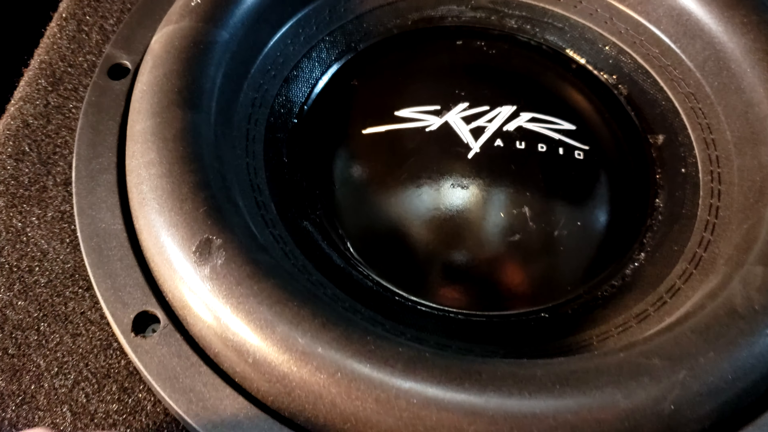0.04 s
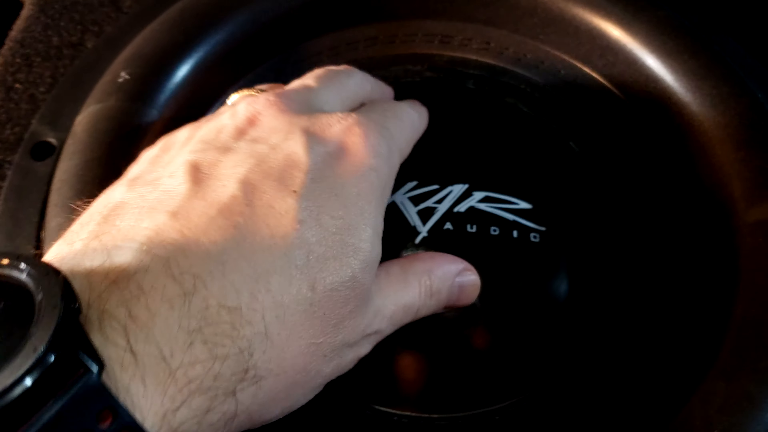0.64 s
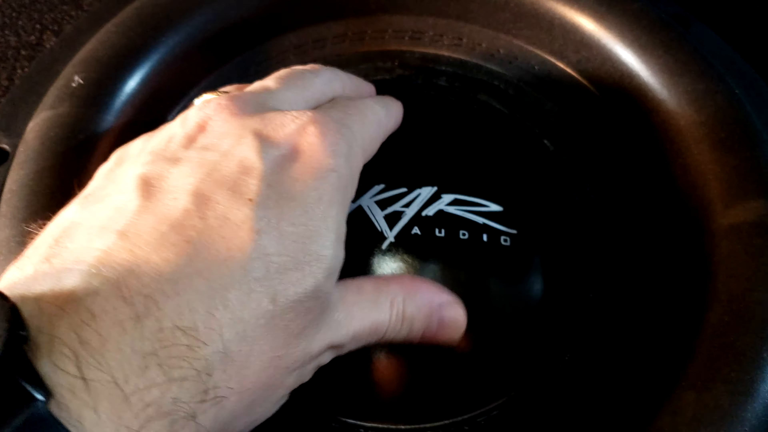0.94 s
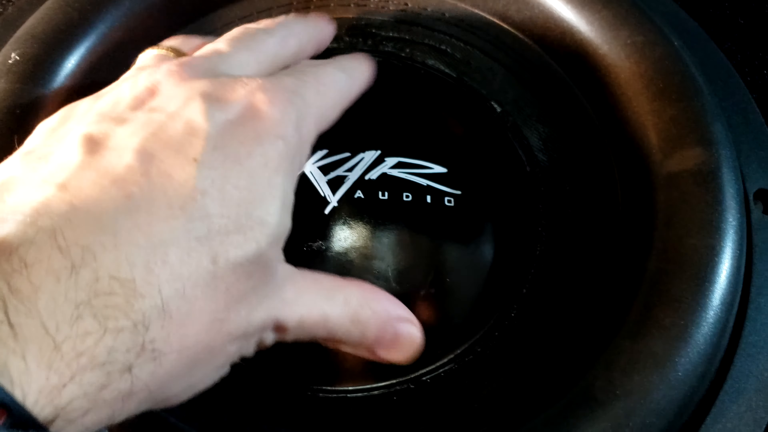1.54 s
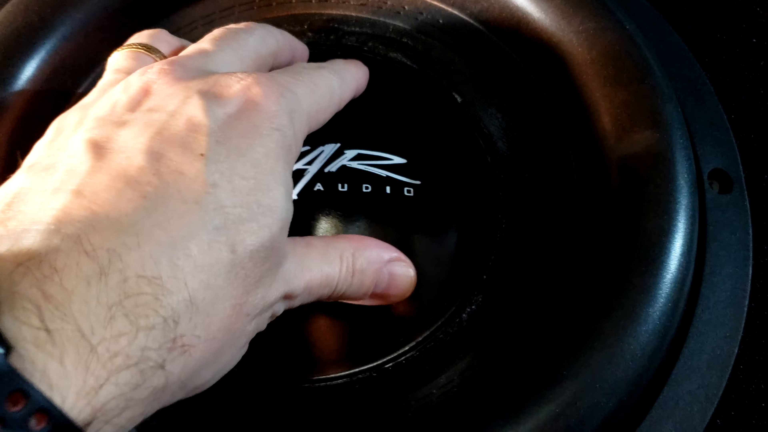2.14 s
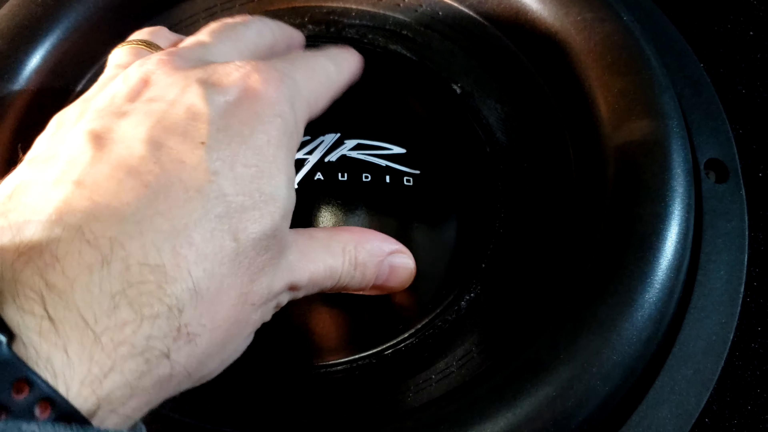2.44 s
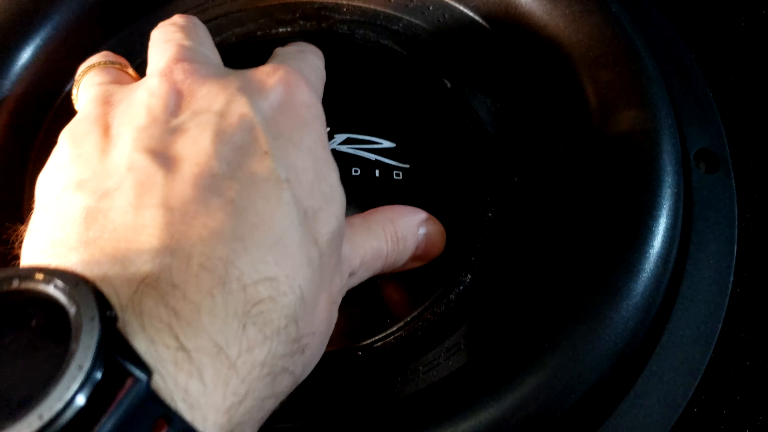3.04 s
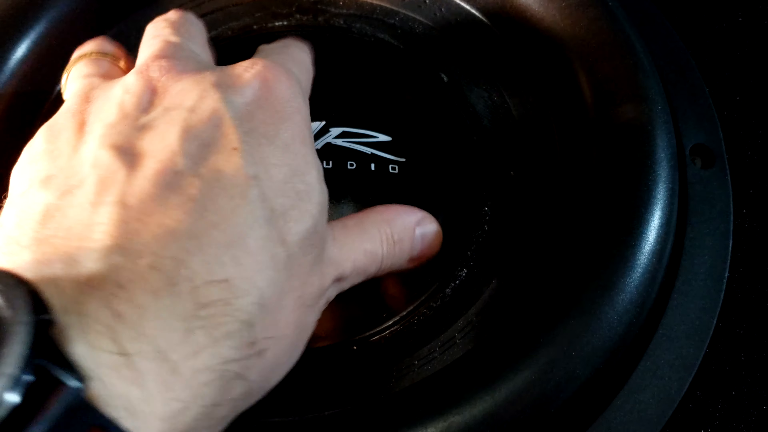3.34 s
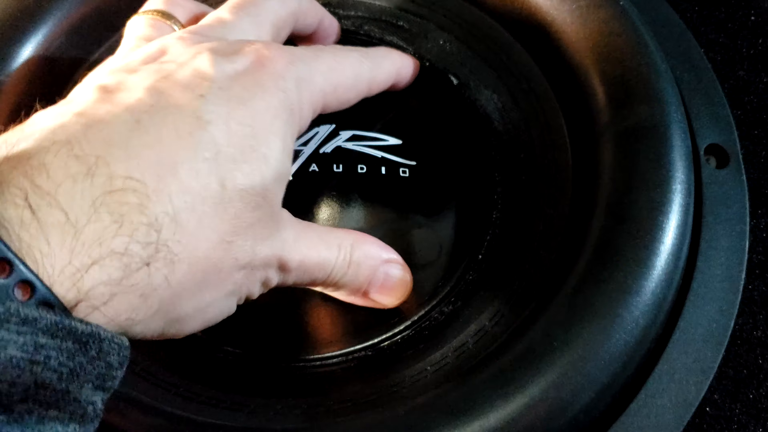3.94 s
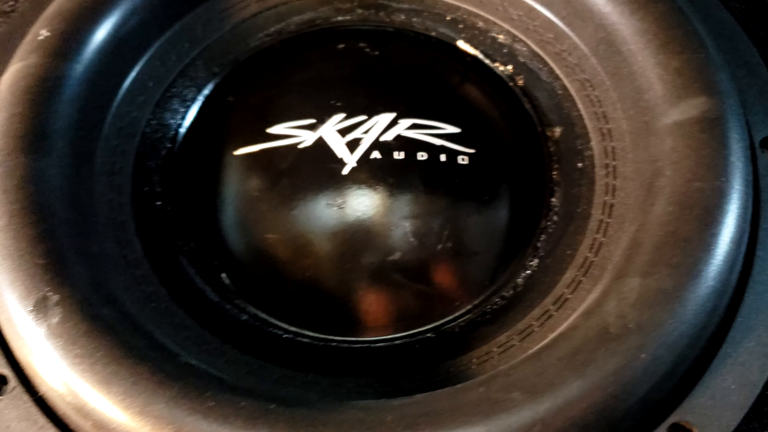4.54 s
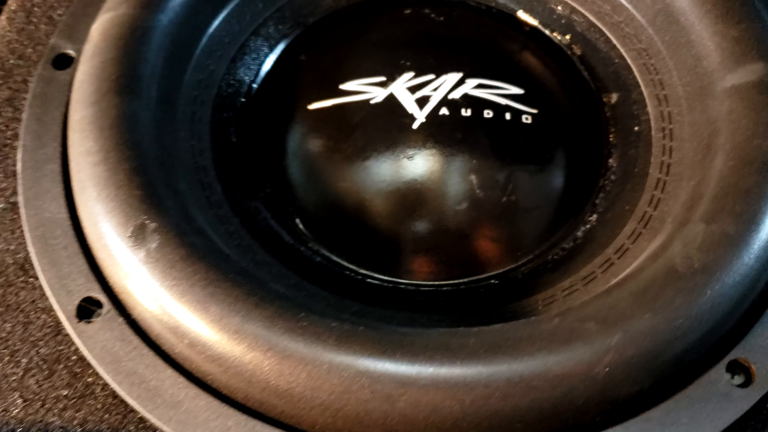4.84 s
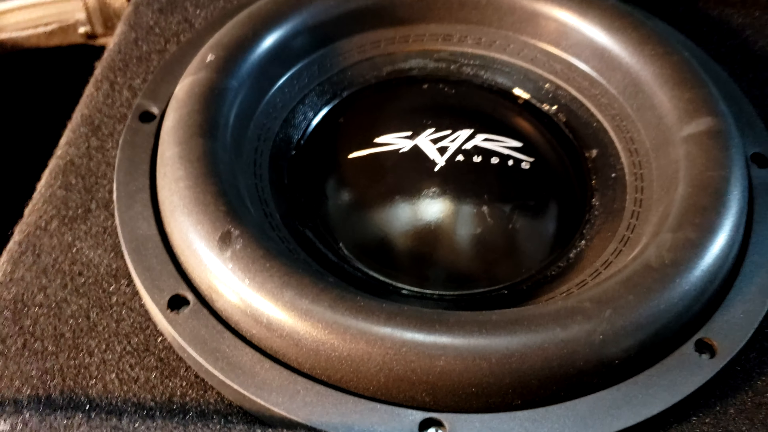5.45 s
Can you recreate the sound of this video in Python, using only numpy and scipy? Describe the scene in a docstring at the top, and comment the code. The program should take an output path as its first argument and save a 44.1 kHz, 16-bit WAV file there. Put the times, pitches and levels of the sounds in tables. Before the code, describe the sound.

Close, irregular fingertip clicks and short bass thumps on a speaker cone, with faint rubbing, low room rumble and final plastic clicks.

```python
"""Hand on a subwoofer cone

A hand presses and taps a boxed subwoofer, close to a hand-held camera in a small, dead space.
Firm pushes swing the cone at its bass resonance; fingertips tick and rub on the stiff dust cap.
Late on, the camera body clicks on the left. Behind: low hum, rumble, hiss and a faint, swelling whine."""
import sys
import numpy as np
from scipy import signal
from scipy.fft import rfft, irfft, next_fast_len
from scipy.io import wavfile
from scipy.ndimage import uniform_filter1d

SR = 44100
rng = np.random.default_rng(int(sys.argv[2]) if len(sys.argv) > 2 else 0)


def master(y):
    """Save y as 16-bit WAV."""
    cut = np.clip(np.atleast_2d(y).T, -1, 1)
    pcm = np.round(cut * 32767)  # scale
    wavfile.write(sys.argv[1], SR, pcm.astype(np.int16))


N = 250929
TIME = np.arange(N) / SR
RING = TIME[:SR // 2]

# Skin drags on the cap. Each row: centre in s, length in s, level in dB, low body in dB, pitch factor.
DRAGS = [(0.692, 0.077, -68, -0.5, 1.064), (0.783, .1, -50.5, -6, 1.013), (0.895, .06, -67.5, -11, 1.08),
         (1.016, .064, -51, -1.5, 0.93), (1.287, 0.044, -45.5, 9, 0.9), (1.570, .07, -55, 4.5, .99),
         (1.764, 0.063, -54.5, -3, 1.007), (1.865, .06, -70.5, -10, 1.01),
         (2.506, 0.081, -56.5, -3.5, 1.145), (2.738, 0.053, -54.5, -15, .99), (2.83, .32, -68.5, 14.5, 1),
         (3.388, 0.071, -54.5, 2.5, 1.044), (3.578, 0.056, -54, -0.5, 1.058), (3.961, 0.046, -70, -2, 1.1),
         (4.16, .1, -55, 10, 1.06)]


def cone(free_hz=51.1, free_t60_s=.2, grip_exponent=3.3, cut_hz=42):
    """Pushes swing the cone on its suspension; a grip that raises the resonance shortens the ring."""
    # Each row: start in s, peak in dB, force rise in s, resonance under the hand in Hz.
    pushes = [(0.655, -28.5, 0.0054, 53.2), (0.798, -43.5, 0.0035, 51), (0.999, -50.5, 0.0047, 59.5),
              (1.269, -36, 0.0024, 86), (1.282, -32, 0.00088, 71.5), (1.736, -32, 0.0055, 62),
              (1.752, -30, 0.0076, 62.5), (2.723, -31.5, 0.0058, 59), (3.087, -44.5, 0.012, 57),
              (3.556, -20.5, 0.0033, 52), (4.123, -41, 0.0042, 49.6), (4.163, -48, 0.0047, 47.5)]
    out = np.zeros((2, N))
    radiation = signal.butter(3, cut_hz, "high", fs=SR, output="sos")  # slow motion does not radiate
    for s, db, rise_s, hz in pushes:
        t60_s = free_t60_s * (free_hz / hz) ** grip_exponent
        force = (RING / rise_s * np.exp(-RING / rise_s)) ** 4
        swing = signal.fftconvolve(force, mode(hz, np.log(1000) / np.pi / t60_s))[:len(RING)]
        pressure = signal.sosfilt(radiation, np.diff(swing, prepend=0))
        pressure = colour(pressure, [(170, 1.5), (300, -17.5), (600, -12.5)])  # flesh cushions the knock
        add(out, s, pressure / np.abs(pressure).max() * undb(db))
    return out


def cap(force, pitch, slope_db_oct, body_db, hiss_db, scatter_db=2, detune=.033, min_width_hz=170):
    """Force rings the dust cap's modes, differently at each spot and microphone; the skin hisses."""
    # Each row: frequency in Hz, width in Hz, left gain in dB, right gain in dB.
    modes = [(218, 74, -9.5, -3.5), (381, 160, -4, -13.5), (620, 77, -38, -21), (797, 43, -10.5, -27),
             (1083, 106.4, 0.5, 7), (1434, 340, -9, -1), (1970, 100, -13, 3.5), (2220, 173.4, -3, -16.5),
             (3360, 360, -9, -74), (4500, 960, -12, -32), (5840, 1100, -8, -7)]
    draws = rng.standard_normal((len(modes), 2, 2, 1))
    ring = 0
    for (hz, width_hz, left_db, right_db), (gain_draw, pitch_draw) in zip(modes, draws):
        gain = undb(np.array([[left_db], [right_db]]) + scatter_db * gain_draw)
        ring += gain * mode(hz * pitch * (1 + detune * pitch_draw), max(width_hz, min_width_hz))
    sound = tilt(signal.fftconvolve(ring, force[None], axes=1), slope_db_oct, low_hz=1150, high_hz=3920)
    sound = colour(sound, [(480, body_db), (800, 3), (1050, 6.5), (1500, 4.5), (4000, 1), (11000, -18)])
    sound = burst(sound, 0, .41)
    envelope = np.sqrt(uniform_filter1d(force ** 2, size=32).clip(0))
    hiss = colour(rng.standard_normal((2, len(force))) * envelope, [(5000, 6), (11000, 10)])
    sound[:, :len(force)] += burst(hiss, hiss_db + slope_db_oct, .86)
    return sound


def finger_ticks(grit=.37, tip_body_db=-2.5):
    """A fingertip lands and skids on the cap, driving the low modes less than the flat pad does."""
    # Each row: time in s, level in dB, brightness in dB per octave.
    taps = [(0.652, -34, 1.5), (0.679, -51, 4.5), (0.7687, -47, 5), (1.002, -55, 0.5), (1.27, -46, -6.5),
            (1.284, -40.5, -12), (1.3537, -58.5, -7.5), (1.555, -55, -9), (1.7369, -45, 2),
            (1.7545, -39, 4.5), (2.498, -43, -4.5), (2.5068, -36.5, -6), (2.526, -47, -7.5),
            (2.7199, -35.5, 1), (2.8054, -56, 12), (3.3575, -53.5, -1.5), (3.3797, -42, -13.5),
            (3.5523, -40.5, 6.5), (3.5573, -43, -3.5), (4.1278, -50, -3), (4.1483, -43.5, -11),
            (4.1607, -44, -6)]
    out = np.zeros((2, N))
    for s, db, slope_db_oct in taps:
        body_db, pitch = grip(s)
        skid_s = .001 * 2 ** min(slope_db_oct / 6, .5)  # brighter ticks are longer skids
        age = RING[:len(RING) // 16] / skid_s
        force = grit * rng.standard_normal(len(age)) * age * np.exp(1 - age)
        force[np.argmax(age > .5)] += 1  # the skin flattens, then grips
        tick = cap(force, pitch, slope_db_oct, body_db + tip_body_db, hiss_db=-26)
        add(out, s - skid_s / 2, burst(tick, db, .0033))
    return out


def finger_drags(firm_db=-56, dulling=.32):
    """Dragging skin rasps on the cap; a harder drag is duller."""
    out = np.zeros((2, N))
    for s, seconds, db, body_db, pitch in DRAGS:
        slope_db_oct = .9 - dulling * (db - firm_db)
        rasp = cap(slips(seconds), pitch, slope_db_oct, body_db, hiss_db=-19)
        add(out, s - seconds / 2, burst(rasp, db, seconds / 2))
    return out


def grip(s):
    """Low body in dB and pitch factor of the drag nearest to time s."""
    return min(DRAGS, key=lambda row: abs(row[0] - s))[3:]


def slips(seconds, spread_db=2.5, rate_hz=7000):
    """Tiny stick-slip releases, swelling and fading with the pressure."""
    size_draw, sign_draw, slip_draw = rng.random((SR, 3))[:int(seconds * SR)].T
    size = undb(-spread_db * np.log(size_draw.clip(.01, 1))) * np.sign(sign_draw - .5)
    return size * (slip_draw < rate_hz / SR) * np.hanning(len(size))


def squeak(s=.52943, seconds=.05, db=-44, slip_hz=720, roughness=.25):
    """As the hand settles, skin chatters on the rubber in a short, gritty squeak."""
    n = int(seconds * SR)
    jitter = level(uniform_filter1d(rng.standard_normal((2, len(RING))), size=40), 0)[:, :n]
    cycles = np.cumsum(slip_hz * np.exp(roughness * jitter[0])) / SR
    force = np.diff(np.floor(cycles), prepend=0) * np.hanning(n) * undb(4 * jitter[1])
    skin = signal.fftconvolve(force, mode(slip_hz, width_hz=450))
    rasp = cap(force, grip(s)[1], slope_db_oct=0, body_db=0, hiss_db=-30) + burst(skin, -5, 1)
    rasp = colour(rasp, [(350, -6.5), (550, 5.5), (2200, -4), (4500, -13), (12000, -28)])
    out = np.zeros((2, N))
    add(out, s, burst(rasp, db, seconds / 2))
    return out


def brushes():
    """Dry skin and sleeve slide past: fine hiss that hardly moves the cone."""
    # Each row: centre in s, length in s, level in dB, brightness in dB per octave, left minus right in dB.
    strokes = [(0.108, .09, -76.5, 2, -6), (0.505, 0.22, -56, -1, -8), (1.61, 0.24, -72, 5, -1),
               (4.849, 0.15, -64, 14, 1.5)]
    # Each row: frequency in Hz, gain in dB.
    spectrum = [(300, -22), (700, -7), (1100, 1.5), (2100, 4.5), (3300, -7), (6500, -3), (12000, -10.5),
                (16000, -9.5)]
    out = np.zeros((2, N))
    for s, seconds, db, slope_db_oct, pan_db in strokes:
        hiss = colour(np.array([slips(seconds, spread_db=1.5) for _ in range(2)]), spectrum)
        hiss = tilt(hiss, slope_db_oct, low_hz=2520, high_hz=14890) * undb([[pan_db / 2], [-pan_db / 2]])
        add(out, s - seconds / 2, burst(hiss, db, seconds / 2))
    return out


def shifting_hand(centre_s=2.68, seconds=.67, db=-72, hz=400):
    """Fingers creep over the cone with a soft, dull rub."""
    ring = mode(hz, width_hz=200)
    rubs = np.array([signal.fftconvolve(slips(seconds, spread_db=2), ring) for _ in range(3)])
    rub = colour(rubs[0] + rubs[1:] / 2, [(450, 9), (700, -2), (2000, -12), (5000, -8)])
    out = np.zeros((2, N))
    add(out, centre_s - seconds / 2, burst(rub, db, seconds / 2))
    return out


def camera_clicks(right_db=-30, latch_s=.0013, jolt_hz=70, jolt_db=-43, jolt_t60_s=.14):
    """The plastic shell clicks beside the left microphone; the hardest click also jolts the body."""
    # Each row: start in s, level in dB, brightness in dB per octave.
    clicks = [(5.4370, -42.5, -7), (5.442, -50.5, 10), (5.471, -52, 3), (5.483, -54, 2), (5.498, -53, -7),
              (5.5375, -33, 3), (5.582, -51.5, -5)]
    # Each row: frequency in Hz, width in Hz, gain in dB.
    shell_modes = [(324, 130, -0.5), (746, 270, -21), (1830, 500, 5.5), (2420, 420, 9.5), (3120, 330, -3),
                   (4097, 594.5, 1.5), (4770, 1000, -1), (6140, 773, -18)]
    out = np.zeros((2, N))
    age_s = RING[:len(RING) // 64]
    for s, db, slope_db_oct in clicks:
        shell = sum(undb(mode_db) * mode(hz * (1 + .033 * rng.standard_normal()), width_hz)
                    for hz, width_hz, mode_db in shell_modes)
        snap = .3 * rng.standard_normal(len(age_s)) * np.exp(-age_s / .0013)
        snap[[0, np.argmax(age_s > latch_s)]] += 1  # the part gives way, then seats
        click = tilt(np.convolve(shell, snap), slope_db_oct, low_hz=2160, high_hz=5900)
        click = colour(click, [(7200, 12.5), (11000, -11.5)])
        add(out, s, burst(click, db, .0041) * undb([[0], [right_db]]))
    out = reflect(out, wet_db=-3, t60_s=.06, gap_s=.018)
    jolt = np.sin(2 * np.pi * jolt_hz * RING) * undb(-60 * RING / jolt_t60_s)
    hardest_s = max(clicks, key=lambda row: row[1])[0]
    add(out, hardest_s, jolt * undb([[jolt_db], [jolt_db - 10]]))
    return out


def room_air():
    """Steady room noise, nearly mono in the bass and wide in the treble."""
    # Each row: frequency in Hz, relative density in dB.
    spectrum = [(88, -28.5), (150, -2.5), (230, -6.5), (279, -15.5), (428, -21.5), (668, -32), (1570, -37),
                (2060, -33), (2230, -33.5), (2860, -33), (8490, -47.5), (11600, -36.5), (15500, -33.5)]
    mid, side = rng.standard_normal((2, N))
    side = colour(side, [(150, -10), (650, -1), (3000, 0)])
    air = level(colour(mid + np.array([side, -side]), spectrum), -68)
    return colour(air, [(250, -1.5), (450, -3.5), (1000, 2), (11000, -1.3), (15000, -1.5)])


def rumble_and_hum(hand_on_s=.4, hand_off_s=4.3, fade_s=.23, flutter_db=2.5):
    """Room rumble and wavering hum; the resting hand adds rumble, and the lowest tone drops meanwhile."""
    # Each row: frequency in Hz, gain in dB.
    rumble_spectrum = [(20, -26), (40, -16.5), (58, -1.5), (76, -3.5), (105, -6.5), (130, -14.5),
                       (160, -15.5), (230, -41), (500, -72)]
    # Each row: frequency in Hz, wavering width in Hz, level in dB.
    hum_tones = [(76, 5, -59.5), (101.7, 6.6, -71), (155.7, 9.2, -73), (180.9, 8, -75.5), (207.8, 11, -77)]
    # Brief dips and rises of the bass. Each row: centre in s, length in s, gain in dB.
    bass_swells = [(0.075, 0.27, -6.5), (2.13, .16, -16.5), (4.5, 0.58, -16), (5.556, .3, 4)]
    resting = np.clip(np.minimum(TIME - hand_on_s, hand_off_s - TIME) / fade_s + .5, 0, 1)
    mid, side = rng.standard_normal((2, N))
    rumble = level(colour(mid + undb(-12.5) * np.array([side, -side]), rumble_spectrum), -62.5)
    rumble *= undb(4 * resting + flutter_db * wavering(3.4, width_hz=1.3))
    (hum_hz, waver_hz, hum_db), *upper_tones = hum_tones
    phase = 2 * np.pi * hum_hz * TIME + .61 * wavering(.76, waver_hz)
    hum = level(np.sin(phase), hum_db) * undb(-4 * resting)
    upper_hum = sum(undb(db) * wavering(hz, width_hz) for hz, width_hz, db in upper_tones)
    bass_gain = undb(sum(db * swell(s, seconds) for s, seconds, db in bass_swells))
    return (rumble + hum) * bass_gain + upper_hum


def whine(hz=2140, width_hz=180):
    """A faint, thin whine comes and goes."""
    # Each row: centre in s, length in s, level in dB.
    swells = [(.45, 0.71, -83), (1.642, 0.41, -75), (2.784, 1, -78), (3.447, 0.21, -77.5),
              (4.228, 0.39, -81), (5.245, 0.6, -81.5)]
    tone = np.array([wavering(hz, width_hz) for _ in range(2)])
    return tone * sum(undb(db) * swell(s, seconds) for s, seconds, db in swells)


def reflect(x, wet_db, t60_s, gap_s):
    """Add dense reflections from nearby surfaces, different at each microphone."""
    envelope = undb(-60 * RING / t60_s) * (1 - np.exp(-(RING / gap_s) ** 2))
    tail = burst(rng.standard_normal((2, len(RING))) * envelope, wet_db, 1 / SR)
    return x + signal.fftconvolve(x, tail, axes=1)[:, :N]


def mode(hz, width_hz):
    """Ring of one resonance, gain 1 at its centre."""
    return 2 * np.pi * width_hz / SR * np.exp(-np.pi * width_hz * RING) * np.cos(2 * np.pi * hz * RING)


def wavering(hz, width_hz):
    """Narrow noise of unit rms: a tone whose level and phase wander."""
    offset = (np.arange(N // 2 + 1) * SR / N - hz) / width_hz
    return level(irfft(rfft(rng.standard_normal(N)) / (1 + (2 * offset) ** 4), N), 0)


def swell(s, seconds):
    """Smooth rise from 0 to 1 and back, centred on time s."""
    return np.cos(np.pi * np.clip((TIME - s) / seconds, -.5, .5)) ** 2


def colour(x, points):
    """Causal filter through (Hz, dB) points, via the cepstrum."""
    n = 2 * next_fast_len(x.shape[-1])
    hz, db = np.transpose(points)
    log_hz = np.log(np.arange(n // 2 + 1) * SR / n + 1)
    cepstrum = irfft(np.log(undb(np.interp(log_hz, np.log(hz), db))))
    cepstrum[1:n // 2] *= 2
    cepstrum[n // 2 + 1:] = 0
    return irfft(rfft(x, n) * np.exp(rfft(cepstrum)))[..., :x.shape[-1]]


def tilt(x, slope_db_oct, low_hz, high_hz):
    """Slope the spectrum between two frequencies."""
    return colour(x, [(low_hz, 0), (high_hz, slope_db_oct * np.log2(high_hz / low_hz))])


def undb(db):
    """Decibels to gain."""
    return 10 ** (np.asarray(db) / 20)


def level(x, db):
    """Set the rms level."""
    return x * undb(db) / np.sqrt(np.mean(x ** 2))


def burst(x, db, seconds):
    """Give a short sound the energy of that level held for that long."""
    return x * undb(db) * np.sqrt(seconds * SR / np.mean(np.sum(x ** 2, axis=-1)))


def add(out, s, x):
    """Mix a sound in at time s."""
    i = max(int(s * SR), 0)
    out[:, i:i + x.shape[-1]] += x[..., :N - i]


def scene():
    """Hand sounds scatter and die quickly in the small space; clicks, bass and background join them."""
    # Response of the microphone ports. Each row: frequency in Hz, gain in dB.
    port_response = [(20, 3.5), (6500, -5.5), (7600, -9), (8600, -12.5), (9800, -6.5), (11500, 0.5),
                     (16000, -3)]
    hand = finger_ticks() + finger_drags() + squeak() + brushes() + shifting_hand()
    hand[0] = np.roll(hand[0], shift=-3)  # reaches the left port first
    hand = reflect(hand, wet_db=-6, t60_s=.014, gap_s=.001)  # off hand and cone
    hand = reflect(hand, wet_db=-10, t60_s=.21, gap_s=.0071)  # room
    close = colour(hand + camera_clicks(), port_response)
    return close + cone() + room_air() + rumble_and_hum() + whine()


def record(dry, left_cut_hz=10, top_hz=15800):
    """The left microphone sheds a little deep bass; both channels lose the top treble."""
    highpass = signal.butter(1, left_cut_hz, "high", fs=SR, output="sos")
    lowpass = signal.ellip(10, .2, 70, top_hz, fs=SR, output="sos")
    left = signal.sosfilt(highpass, dry[0])
    return signal.sosfilt(lowpass, np.array([left, dry[1]]))


dry = scene()
out = record(dry)
master(out)
```